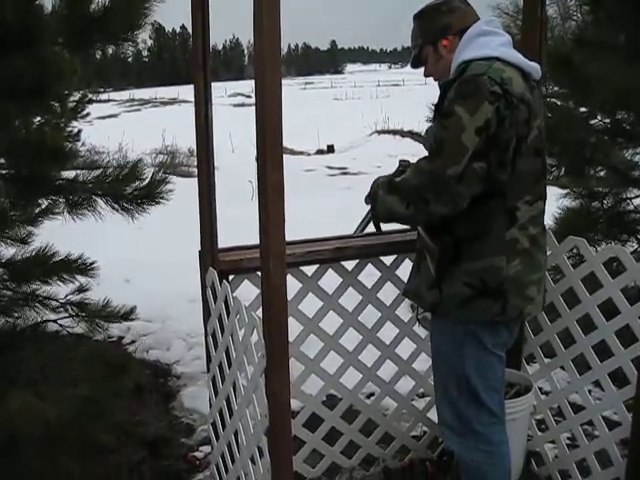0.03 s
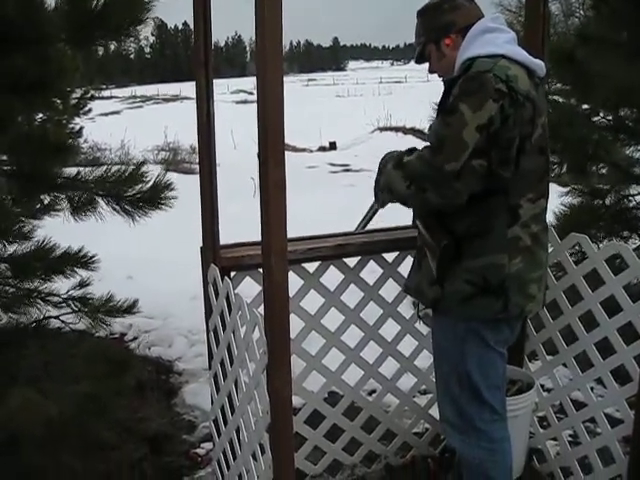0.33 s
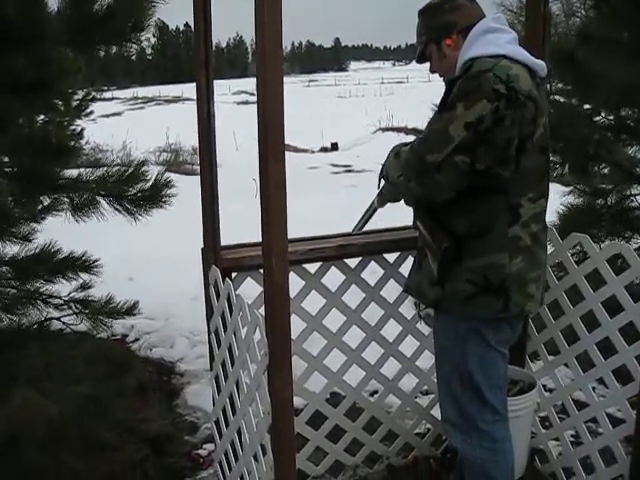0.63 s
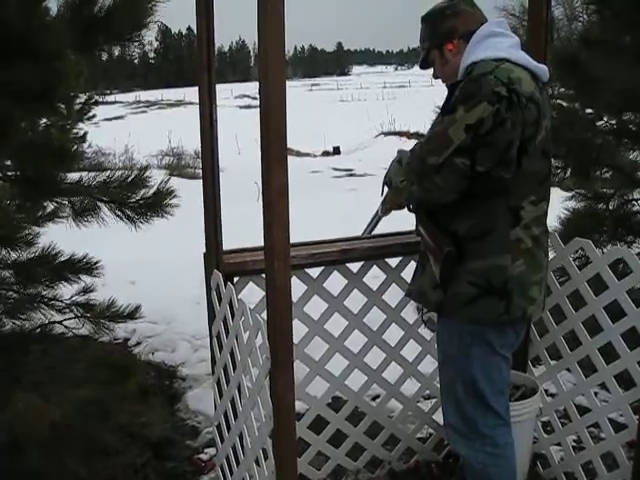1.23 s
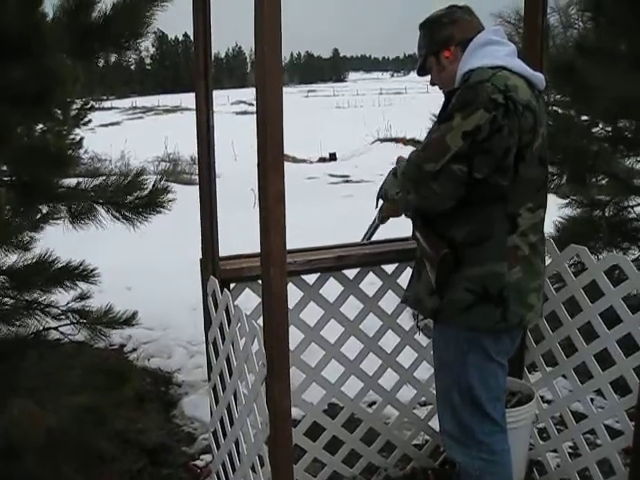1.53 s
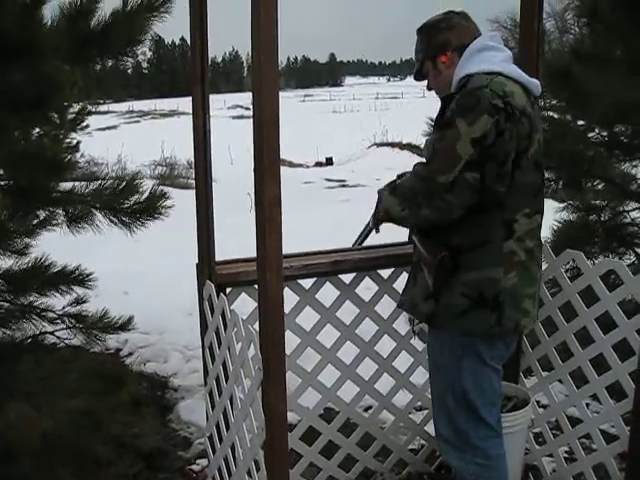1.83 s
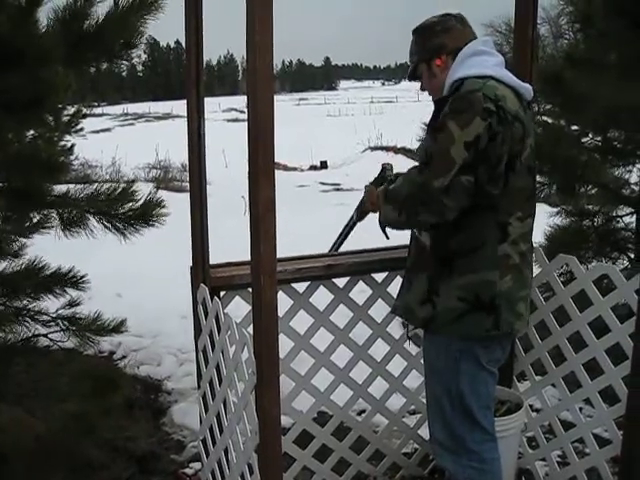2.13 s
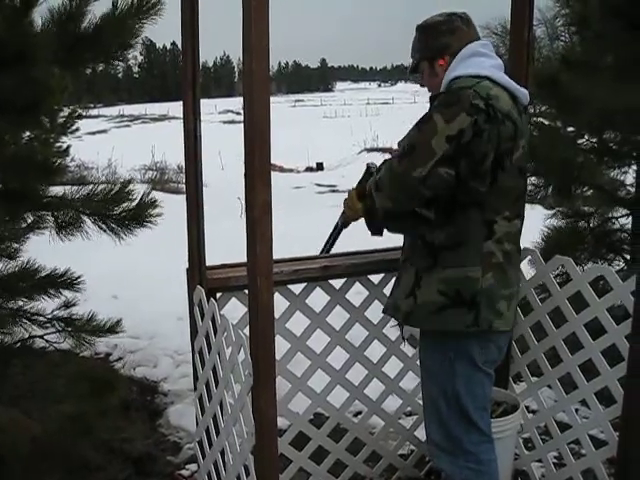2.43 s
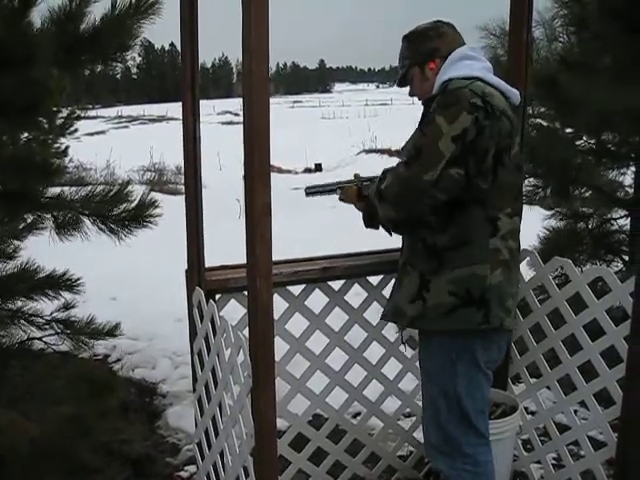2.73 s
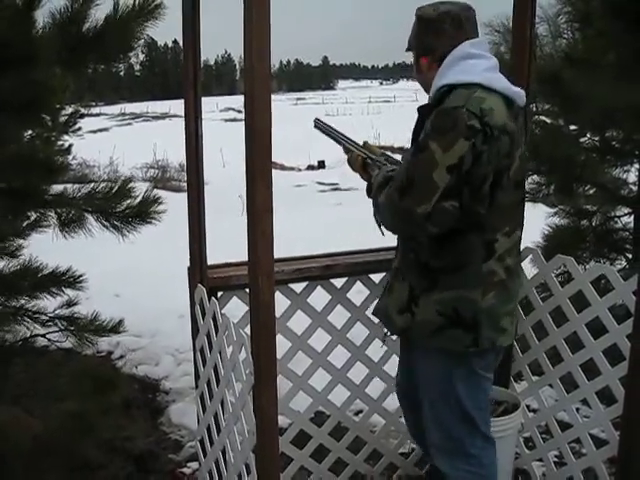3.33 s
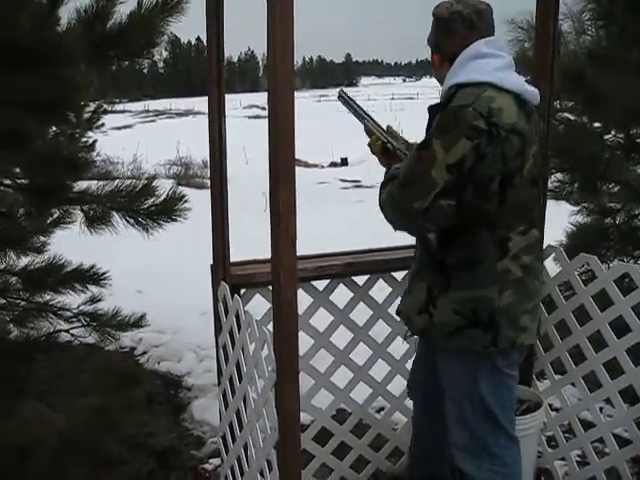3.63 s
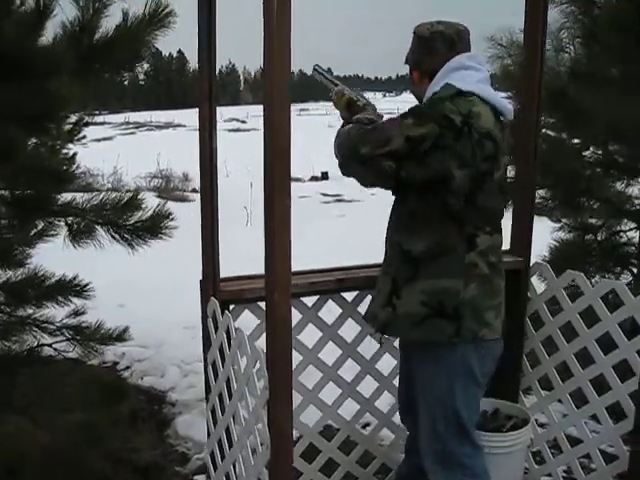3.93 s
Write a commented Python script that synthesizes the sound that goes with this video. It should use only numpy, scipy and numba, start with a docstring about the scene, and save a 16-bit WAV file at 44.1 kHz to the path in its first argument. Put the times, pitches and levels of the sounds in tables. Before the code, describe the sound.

Gusty wind on the microphone, with a shotgun clicking closed and then an echoing gunshot.

```python
"""A porch by a snowy field, one camera microphone out in the wind.
Turbulence hits the microphone in short puffs and sharp knocks; the strong ones duck the limiter.
Close by, a double shotgun is handled: cloth scrapes softly, metal slides in the open breech,
and the action snaps shut with a ring of steel. Near the end a shot cracks and the distant woods
return it as a rushing echo, with two bright rushes of noise in it."""
import sys
import numpy as np
from scipy import signal
from scipy.fft import rfft, irfft, next_fast_len
from scipy.io import wavfile
from scipy.ndimage import map_coordinates
from numba import njit

SR = 44100
rng = np.random.default_rng(int(sys.argv[2]) if len(sys.argv) > 2 else 0)


def master_out(mix):
    """Clip the mix to full scale and print it as 16-bit PCM to the path in sys.argv[1]."""
    frames = np.transpose(np.atleast_2d(mix))
    ceiling = np.clip(frames, -1, 1)
    pcm = np.round(ceiling * 32767).astype(np.int16)
    wavfile.write(sys.argv[1], SR, pcm)


N = 176400


def amp(db):
    """Decibels to gain."""
    return 10 ** (np.asarray(db) / 20)


def unit(x):
    """Scaled to rms 1."""
    return x / np.sqrt(np.mean(x ** 2) + 1e-20)


def clock():
    """The time of every sample in seconds."""
    return np.arange(N) / SR


def filtered(x, response):
    """x times a response of frequency."""
    size = next_fast_len(len(x) + 4096)
    return irfft(rfft(x, size) * response(np.fft.rfftfreq(size, 1 / SR)), size)[:len(x)]


def noise(colour):
    """Noise of rms 1, shaped by (frequency [Hz], level [dB]) points."""
    points_hz, db = np.transpose(colour)
    response = lambda hz: amp(np.interp(np.log(hz + 1), np.log(points_hz), db))
    return unit(filtered(rng.standard_normal(N), response))


def wobble(rate, size=N):
    """A smooth random curve, rate knots a second."""
    knots = rng.standard_normal(int(size * rate / SR) + 4)
    return map_coordinates(knots, [np.arange(size) / SR * rate])


def swell(t, length, edge=4.1):
    """A rounded hump around t = 0; a higher edge makes it squarer."""
    return np.exp(-np.abs(t / (0.65 * length)) ** edge)


def dying(start, t60):
    """An envelope that opens at start and falls 60 dB in t60 seconds."""
    t = clock() - start
    return (t >= 0) * amp(-60 * np.abs(t) / t60)


def turbulence(x, top_hz, low_share=0.17):
    """Wind pressure on the microphone, at rms 1: thin below its low edge, dark above its top."""
    low_hz = low_share * top_hz
    low_cut = lambda hz: 1 / np.hypot(1, (low_hz / (hz + 1)) ** 2)
    return unit(filtered(x, lambda hz: low_cut(hz) / np.hypot(1, (hz / top_hz) ** 4.45)))


# Hush of the open field, with hiss: (frequency [Hz], relative level [dB])
FIELD_COLOUR = [(100, -1), (600, 8.5), (1500, -5), (3000, -15), (6500, -21), (10000, -20.5), (15000, -25.5)]
# Lulls in the wind at the microphone: (centre time [s], length [s])
WIND_LULLS = [(1.482, 0.018), (2.126, 0.03), (2.419, 0.018), (2.98, 0.074), (3.847, 0.065)]


def breeze():
    """Large eddies rumble and small ones churn on the microphone; lulls leave rumble and field hush."""
    eddy = wobble(39.91)
    lull_db = -15 * sum(swell(clock() - time, length) for time, length in WIND_LULLS)
    rumble_gain = amp(1.5 * eddy + 0.55 * lull_db)
    churn_gain = amp(6 * eddy + lull_db)
    rumble = turbulence(rng.standard_normal(N) * rumble_gain, top_hz=232, low_share=0.2138)
    churn = turbulence(rng.standard_normal(N) * churn_gain, top_hz=476)
    return amp(-25) * rumble + amp(-26.5) * churn + amp(-46.5) * noise(FIELD_COLOUR)


# Buffets right on the microphone: (centre time [s], length [s], level [dB], pitch [Hz])
WIND_KNOCKS = [(0.0098, .0025, 3.5, 721), (0.1963, 0.00084, -8, 474.4), (0.4119, 0.0016, 5, 382),
               (0.5003, 0.0025, -5, 410.6), (0.6671, .0028, 3.5, 509), (0.8797, .002, -2.5, 939),
               (0.9291, 0.0043, 0.5, 282.8), (0.9564, 0.0011, 3.5, 699.5), (1.0218, 0.0014, 5.5, 820),
               (1.1247, 0.0013, -2.5, 721), (1.175, 0.0022, -3.5, 321), (1.2057, 0.00087, -3.5, 851),
               (1.655, 0.0046, 3.5, 645.6), (1.7034, 0.0018, 1.5, 498.6), (1.813, 0.001, -4.5, 312.6),
               (1.8761, 0.0013, 6.5, 519.5), (1.8907, .001, 7.5, 660), (1.9134, .0009, 5.5, 598),
               (2.0168, 0.0027, -3.5, 329), (2.042, 0.0035, -3, 591), (2.284, 0.0012, 0.5, 335),
               (2.385, 0.0023, 2.5, 307), (2.4943, 0.0014, 2, 591), (2.5146, 0.0017, -1, 720),
               (2.5481, 0.0011, 5, 660), (2.6376, 0.0013, -0.5, 423), (2.8075, .002, 3.5, 519),
               (3.14, 0.0036, -1, 303), (3.171, 0.0022, -2, 399.4), (3.2058, 0.0015, -4.5, 929),
               (3.244, .0018, -2.5, 362), (3.312, 0.0028, 1, 541), (3.382, 0.0017, -2, 995),
               (3.434, .0018, 3.5, 803), (3.7244, 0.0011, 2, 615)]


def knocks():
    """A buffet is one pressure peak with a few swings, amid a brief flutter; longer ones sound hollow."""
    out, t = np.zeros(N + SR), np.arange(-2048, 2048) / SR
    for time, length, db, hz in WIND_KNOCKS:
        phase = 2 * np.pi * hz * t + 0.73 * wobble(2 * hz, len(t))  # uneven swings
        shape = np.hanning(len(t)) / (1 + (2 * t / length) ** 2)
        flutter = turbulence(rng.standard_normal(len(t)), top_hz=hz) * swell(t, length=0.015, edge=2.2)
        out[round(time * SR):][:len(t)] += amp(db) * shape * np.cos(phase) + amp(-17) * flutter
    return out[len(t) // 2:][:N]


# Gusts right on the microphone: (centre time [s], length [s], level [dB], top frequency [Hz])
WIND_PUFFS = [(0.027, 0.03, -11, 1200), (0.061, 0.0042, -11.5, 1280), (0.126, 0.0069, -11.5, 254),
              (0.192, 0.022, -13.5, 700), (0.248, 0.012, -14, 526), (0.351, 0.0058, -12.5, 550),
              (0.491, 0.026, -14, 810), (0.549, 0.027, -12.5, 454), (0.748, 0.016, -11, 373),
              (0.778, 0.014, -5.5, 455), (0.84, 0.012, -10.5, 800), (0.888, 0.014, -12, 1000),
              (1.01, 0.013, -13, 356), (1.036, 0.035, -10.5, 920), (1.087, 0.0073, -14, 463),
              (1.308, 0.029, -16.5, 550), (1.369, 0.02, -15, 446), (1.412, 0.022, -13, 422),
              (1.571, 0.0074, -12, 552), (1.759, 0.0092, -11.5, 414), (1.849, 0.006, -9.5, 353),
              (1.892, 0.0091, -13.5, 1105), (2.076, 0.013, -16.5, 502), (2.203, 0.025, -16.5, 526),
              (2.316, 0.05, -16, 803), (2.563, 0.065, -13.5, 1030), (2.674, 0.022, -14.5, 714),
              (2.737, 0.06, -14.5, 880), (2.865, 0.017, -11, 600), (2.934, 0.009, -12.5, 284),
              (3.029, 0.016, -12, 444), (3.26, 0.018, -14.5, 890), (3.354, 0.026, -17, 754),
              (3.401, 0.015, -14.5, 974), (3.458, 0.045, -14, 1040), (3.511, 0.013, -7.5, 907),
              (3.651, 0.12, -21.5, 700), (3.922, 0.015, -7, 588)]


def puffs():
    """Each gust is a short, spiky burst of turbulence whose strongest eddies crackle an octave higher."""
    spike_db, spike_hz = 6, 449.9
    out, size = np.zeros(N + SR), 8192
    t = (np.arange(size) - size // 2) / SR
    for time, length, db, top_hz in WIND_PUFFS:
        shape = swell(t, length)
        eddies = amp(spike_db * wobble(spike_hz, size))
        flow = turbulence(rng.standard_normal(size) * eddies * shape, top_hz)
        crackle = turbulence(rng.standard_normal(size) * eddies ** 2 * shape, 2 * top_hz, low_share=0.5)
        gain = amp(db) * np.sqrt(np.mean(shape ** 2))  # the level holds at the crest, for any length
        out[round(time * SR):][:size] += gain * (flow + amp(-18.5) * crackle)
    return out[size // 2:][:N]


def grainy_swells(swells, colour, grain_db):
    """Grainy noise that rises and falls in rounded humps."""
    envelope = sum(amp(db) * swell(clock() - time, length, edge=2.6) for time, length, db in swells)
    return envelope * unit(noise(colour) * amp(grain_db * wobble(320)))


# Cloth scrapes close by; the last two rows are bright rushes in the shot's echo:
# (centre time [s], length [s], level [dB])
SCRAPES_AND_RUSHES = [(1.48, 0.14, -49), (1.942, 0.012, -32.5), (2.197, 0.28, -54), (2.883, 0.005, -40),
                      (3.835, .04, -36), (3.965, 0.008, -25)]
# Colour of both: (frequency [Hz], relative level [dB])
SCRAPE_AND_RUSH_COLOUR = [(500, -3), (1500, 9.5), (3000, 2.5), (4300, -2), (5300, -5), (7000, -3),
                          (10000, -12.5), (15000, -27.5)]


def scrapes_and_rushes():
    """Soft scrapes of cloth, then two bright rushes of noise in the shot's echo."""
    return grainy_swells(SCRAPES_AND_RUSHES, SCRAPE_AND_RUSH_COLOUR, grain_db=1)


# Short slides in the breech, close by: (centre time [s], length [s], level [dB])
METAL_STROKES = [(1.686, 0.005, -33), (2.477, 0.017, -41)]
# Thin rasp of the metal: (frequency [Hz], relative level [dB])
METAL_COLOUR = [(1500, -2), (3000, -7), (4700, -5.5), (5250, 7), (5900, -8), (7000, -10.5), (14000, -23)]


def breech_slides():
    """Metal rubs on metal in the open breech, with a coarse grain."""
    return grainy_swells(METAL_STROKES, METAL_COLOUR, grain_db=-4.5)


# Contacts as the action closes, near the microphone: (time [s], level [dB])
ACTION_CONTACTS = [(2.6214, -41.5), (2.6273, -27.5), (2.6308, -20), (2.636, -20)]
# Ringing modes of the steel: (frequency [Hz], relative level [dB], t60 [s])
STEEL_MODES = [(2480, 9, .08), (5582, -8, 0.13), (6250, -5, .2), (6950, -8, .12), (8300, 1, 0.1),
               (9800, -6, 0.2), (12950, -5, 0.19), (13900, -6.5, .17)]
# Snap of one contact: (frequency [Hz], relative level [dB])
SNAP_COLOUR = [(200, -6.5), (900, 3), (2000, 3.5), (4000, -7), (7000, -5.5), (11000, -11), (15000, -12)]


def breech_snap():
    """The breech snaps shut: each contact cracks, rings the steel and scatters round the porch."""
    out, t = np.zeros(N), clock()
    wavers = [0.8 * wobble(145) for _ in STEEL_MODES]  # unsteady phase of the loose parts, in radians
    for time, db in ACTION_CONTACTS:
        ring = np.zeros(N)
        for (hz, mode_db, t60), waver in zip(STEEL_MODES, wavers):
            strength = amp(mode_db + rng.normal(0, 1.5))
            ring += strength * dying(time, t60) * np.sin(2 * np.pi * hz * (t - time) + waver)
        porch = amp(-10.5) * dying(time, t60=0.12)
        snap = noise(SNAP_COLOUR) * (dying(time, t60=0.037) + porch)
        out += amp(db) * (snap + amp(-22) * ring)
    return out


# The crack, straight to the microphone: (frequency [Hz], relative level [dB])
CRACK_COLOUR = [(100, -3.5), (500, 16), (1500, 7), (3500, -1.5), (6000, -11.5), (10000, -33.5),
                (15000, -46.5)]
# Echo off the distant woods: (frequency [Hz], relative level [dB])
WOODS_COLOUR = [(100, -38.5), (400, -3), (900, 4), (1700, 4.5), (2300, -1), (3600, -1.5), (5000, -8.5),
                (7000, -13), (13000, -43.5)]
# Strength of that echo, before the air dulls it: (time [s], level [dB])
WOODS_ECHO = [(3.535, -22.5), (3.559, -18.5), (3.6, -23), (3.685, -19), (3.742, -28), (3.8, -22),
              (3.91, -25), (3.95, -33.5), (4.0, -26.5)]


def shot():
    """A sharp crack, then countless echoes from the trees, duller the more air they have crossed."""
    start_s, dulling_db_per_khz_s = 3.524, 5
    crack = amp(4.5) * noise(CRACK_COLOUR) * dying(start_s, t60=0.026)
    hz, t, spectrum = signal.stft(noise(WOODS_COLOUR), SR, nperseg=256)
    loss_db = dulling_db_per_khz_s * hz[:, None] / 1000 * np.maximum(t - start_s, 0)
    trees = signal.istft(spectrum * amp(-loss_db), SR, nperseg=256)[1][:N]
    echo_db = np.interp(clock(), *np.transpose(WOODS_ECHO)) + 1.96 * wobble(160)
    return crack + trees * amp(echo_db) * (clock() > start_s)


def scene():
    """Wind, gun handling and the shot at one microphone on the porch."""
    wind = breeze() + knocks() + puffs()
    return (wind + scrapes_and_rushes() + breech_slides() + breech_snap() + shot())[None]


@njit
def ducking(over_db, attack_s, release_db_per_s):
    """Gain reduction in dB: it climbs fast towards any overshoot and sinks back at a steady rate."""
    attack = 1 - np.exp(-1 / (attack_s * SR))
    out, cut = np.zeros(len(over_db)), 0.
    for i in range(len(over_db)):
        if over_db[i] > cut:
            cut += attack * (over_db[i] - cut)
        else:
            cut = max(cut - release_db_per_s / SR, 0.)
        out[i] = cut
    return out


def record(dry):
    """The camera limits in small steps that tick, clips what slips by, softens and notches the treble."""
    threshold, step_db, ceiling = 0.43, 0.64, 0.71
    notch_hz, notch_width_hz, rolloff_hz, top_hz = 7850, 530, 9450, 15750
    over_db = 20 * np.log10(np.abs(dry[0]) / threshold + 1e-9)
    cut_db = ducking(over_db, attack_s=0.0012, release_db_per_s=100.5)
    stepped_gain = amp(-step_db * np.ceil(cut_db / step_db))
    limited = np.clip(dry[0] * stepped_gain, -ceiling, ceiling)
    notch = lambda hz: (hz - notch_hz) / (hz - notch_hz - 1j * notch_width_hz)
    rolloff = lambda hz: (hz < top_hz) / np.hypot(1, (hz / rolloff_hz) ** 2)
    return filtered(limited, lambda hz: notch(hz) * rolloff(hz))[None]


dry = scene()
out = record(dry)
master_out(out)
```